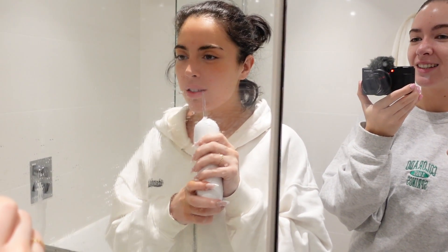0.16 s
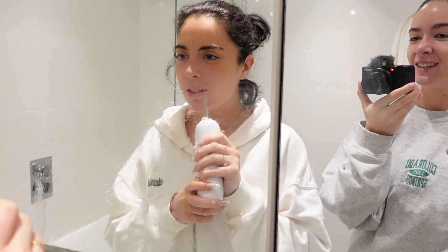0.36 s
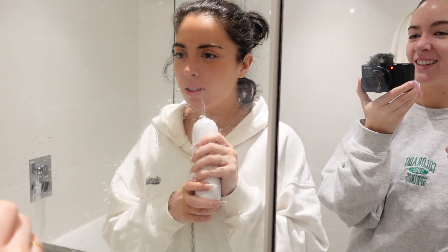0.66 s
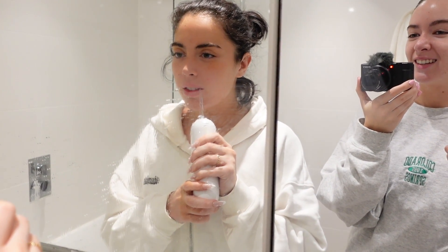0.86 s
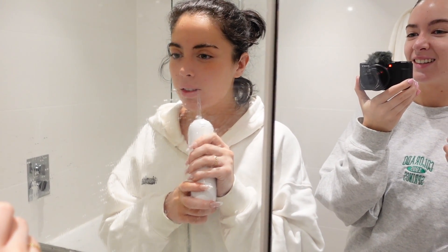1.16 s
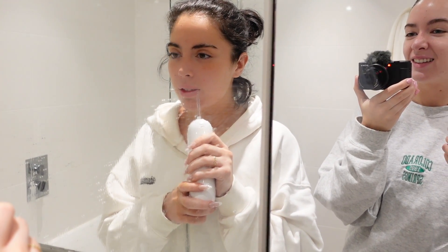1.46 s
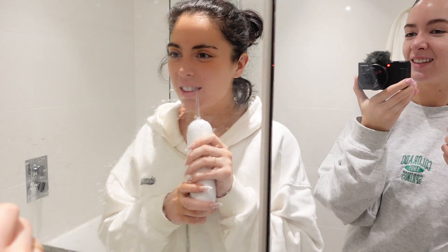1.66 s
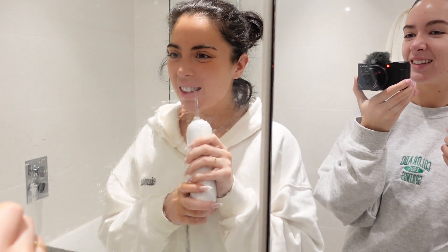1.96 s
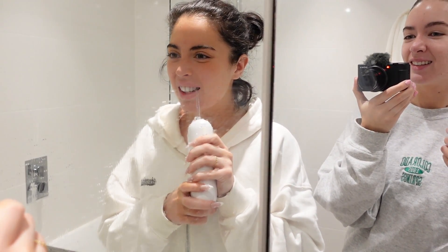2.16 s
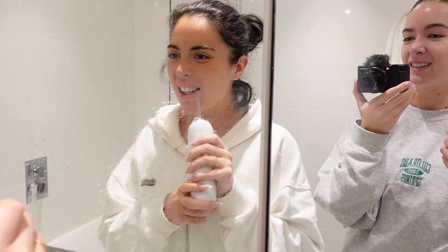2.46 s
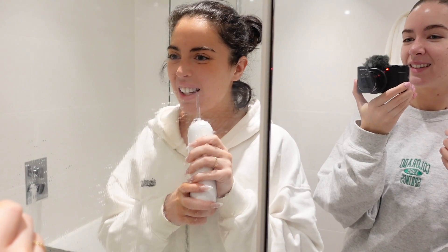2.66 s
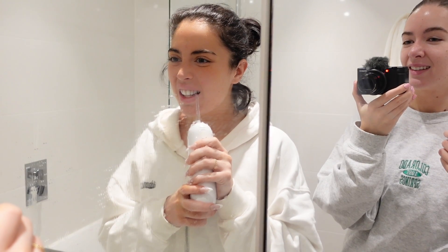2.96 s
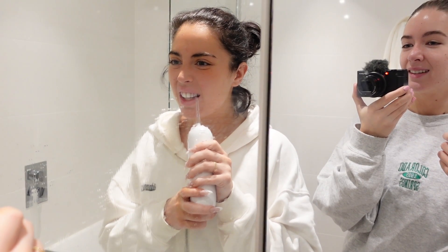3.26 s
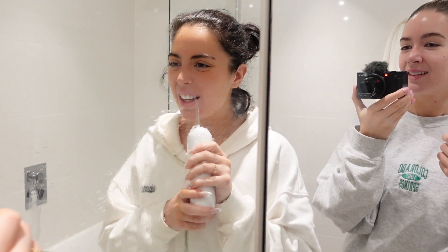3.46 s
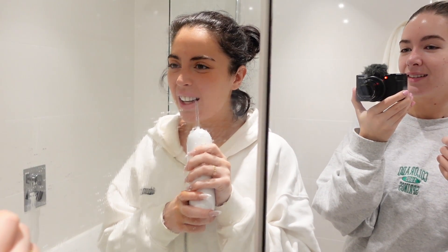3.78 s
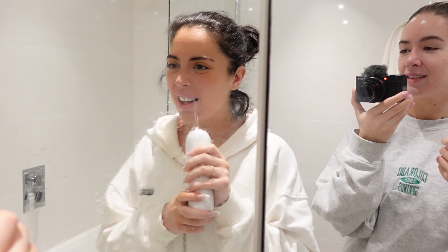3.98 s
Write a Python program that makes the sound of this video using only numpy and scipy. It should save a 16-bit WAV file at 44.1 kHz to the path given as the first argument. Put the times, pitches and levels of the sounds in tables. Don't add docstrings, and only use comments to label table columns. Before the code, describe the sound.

Quiet airy hiss and vent hum, with one dry double-edged button tick, precede a small pump motor that starts suddenly. Its plastic gears chatter and whistle at rapid strokes, ringing the hollow handle, with irregular hard knocks and thin spray hiss over it. Short bright tile reflections surround the close, almost centred sound until the cut.

```python
import sys
import numpy as np
from scipy import signal
from scipy.fft import rfft, irfft, next_fast_len
from scipy.io import wavfile
from scipy.ndimage import uniform_filter1d, minimum_filter1d, map_coordinates

SR = 44100
rng = np.random.default_rng(int(sys.argv[2]) if len(sys.argv) > 2 else 0)


def voltage_ratio(level):
    return 10 ** (np.asarray(level, float) / 20)


def put_to_file(sound):
    columns = np.atleast_2d(sound).T
    safe = np.clip(columns, -1, 1)
    whole_steps = np.round(safe * 32767)
    wavfile.write(sys.argv[1], SR, whole_steps.astype(np.int16))


N = 181824
SWITCH_S = 1.219


def unit(x):
    return x / np.sqrt(np.mean(x ** 2) + 1e-20)


def along(points, hz):
    point_hz, value = np.transpose(points)
    return np.interp(np.log(hz + 1), np.log(point_hz + 1), value)


def curves(rows):
    start_s, *columns = np.transpose(rows)
    return [np.interp(np.arange(N) / SR, start_s, column) for column in columns]


def wobble(rate):
    knots = rng.standard_normal(int(N * rate / SR) + 4)
    return map_coordinates(knots, [np.arange(N) * rate / SR])


def filtered(x, response):
    size = 2 * next_fast_len(N // 2 + SR // 4)
    return irfft(rfft(x, size) * response(np.fft.rfftfreq(size, 1 / SR)), size)[..., :N]


def causal(colour):
    def response(hz):
        cepstrum = irfft(np.log(voltage_ratio(along(colour, hz)) + 1e-5))
        cepstrum[1:len(hz) - 1] *= 2
        cepstrum[len(hz):] = 0
        return np.exp(rfft(cepstrum))
    return response


def modes(table):
    def response(hz):
        total = 0
        for pitch, width, db in table:
            damping = 1j * hz * width
            total = total + voltage_ratio(db) * damping / (pitch * pitch - hz * hz + damping)
        return total
    return response


def ring(hits, gain, extra, response):
    return filtered(hits * gain + extra, response) / np.std(filtered(hits, response))


def patchy(x, depth_db):
    z = signal.stft(x, nperseg=256)[2]
    field = uniform_filter1d(rng.standard_normal(z.shape), size=3, axis=0)
    field = uniform_filter1d(field, size=8, axis=1)
    return unit(signal.istft(z * voltage_ratio(depth_db * unit(field)), nperseg=256)[1][:N])


def hush():
    # pitch_hz [Hz], level_db [dB per Hz]
    air_colour = [(15, -78), (25, -48), (49, -26.5), (141, -8), (179, -9.5), (216, -7.5), (473, -11),
                  (710, -9.5), (955, -15.5), (1360, -13), (1590, -12), (1820, -19), (2330, -18),
                  (4690, -24.5), (15800, -30)]
    # pitch_hz [Hz], likeness [0 to 1]
    likeness = [(60, 0.7), (130, 0.72), (290, 0.79), (640, 0.44), (1410, 0.3), (3100, 0.51), (6820, 0.58),
                (15000, 0.88)]
    # pitch_hz [Hz], width_hz [Hz], level_db [dB]
    duct_modes = [(226, 240, -14), (677, 62, -2.5), (1620, 67, -4)]

    def spread(hz):
        turn = np.arccos(np.clip(along(likeness, hz), -1, 1)) / 2
        return voltage_ratio(along(air_colour, hz)) * np.array([np.cos(turn), np.sin(turn)])

    noise, t = rng.standard_normal((2, N)), np.arange(N) / SR
    draught_s, draught_width_s, draught_db = 0.5, 0.14, 7
    swell_db = draught_db * np.exp(-0.5 * ((t - draught_s) / draught_width_s) ** 2)
    swell_db = swell_db - 3.0 + 0.96 * wobble(9)
    duct = voltage_ratio(swell_db) * filtered(noise, lambda hz: spread(hz) * np.abs(modes(duct_modes)(hz)))
    mid, side = filtered(noise, spread) + duct
    level_db = -62.5 + 0.3 * wobble(6)
    return voltage_ratio(level_db) * unit(np.array([mid + side, mid - side]))


def tiles(x):
    # pitch_hz [Hz], fade_s [s]
    fade_times = [(300, 0.32), (1300, 0.51), (3500, 0.42), (9000, 0.36), (15000, 0.11)]
    hz, t, z = signal.stft(rng.standard_normal((2, SR // 2)), SR, nperseg=256)
    mirror = voltage_ratio(-1.0 - 60 * t / 0.051)
    fall = voltage_ratio(-60 * t / along(fade_times, hz)[:, None]) + mirror
    tail = signal.istft(z * fall, SR, nperseg=256)[1]
    tail = tail / np.linalg.norm(tail[0])
    late = np.pad(x, (150, 0))
    return signal.fftconvolve(late[None], tail, axes=1)[:, :N]


def button():
    # start_s [s], peak_db [dB]
    contacts = [
        (0.1904, -35.5),
        (0.1916, -33.5),
        (.1926, -39),
        (.1934, -45),
        (0.1944, -39),
    ]
    # pitch_hz [Hz], level_db [dB per Hz]
    cap_colour = [(290, -38), (500, -0.5), (1450, 1), (1910, 1.5), (3140, 0.5), (3770, -2), (4870, 1),
                  (5950, -6.5), (8610, -9), (15000, -26)]
    out, t = np.zeros((2, N)), np.arange(SR // 100) / SR
    fade = voltage_ratio(-60 * t / 0.003)
    for start_s, peak_db in contacts:
        tick = fade * np.sign(rng.standard_normal(len(t)))
        out[0, round(start_s * SR):][:len(t)] += voltage_ratio(peak_db + 7.5) * tick
    out[1, round(contacts[1][0] * SR)] = np.linalg.norm(out[0])
    return filtered(out, causal(cap_colour))


def singing():
    # start_s [s], length_s [s], pitch_hz [Hz], level_db [dB]
    rings = [(1.222, .045, 2200, -63), (1.232, 0.028, 1100, -46.5), (1.258, 0.027, 1500, -38.5),
             (1.311, 0.013, 1273, -26), (1.35, 0.017, 1300, -28), (1.355, 0.026, 2020, -31),
             (1.305, .02, 2530, -45), (1.41, 0.092, 2073, -21.5), (1.42, 0.026, 2395, -22.5),
             (1.8, 0.04, 1540, -29), (3.882, 0.017, 1530, -19), (3.463, 0.0296, 570, -42),
             (2.9, 0.057, 510, -49.5), (2.4, 0.021, 1150, -32), (2.35, 0.019, 1180, -30),
             (2, 0.038, 670, -42)]
    out, t = np.zeros(N), np.arange(N) / SR
    for start_s, length_s, pitch_hz, level_db in rings:
        bell = np.sin(np.pi * np.clip((t - start_s) / length_s, 0, 1)) ** 0.62
        out += voltage_ratio(level_db + 4.5) * bell * np.sin(2 * np.pi * pitch_hz * t + 0.36 * wobble(40))
    return out


def effort():
    # start_s [s], load_db [dB]
    back_pressure = [(1.2, 0), (1.43, .5), (1.55, -1), (1.8, -1), (2.06, 0.5), (2.35, -1), (2.55, 2),
                     (2.74, -1), (2.93, 2.5), (3.2, 1), (3.45, 0.5), (3.75, -1), (4.12, -.5)]
    # start_s [s], change_db [dB]
    surges = [(1.32, 0.5), (1.5, -0.5), (1.66, 2.5), (1.7, -2), (2.13, -4), (2.19, 3), (2.23, 0.5),
              (2.28, 5.5), (2.35, 0), (2.47, 1.5), (2.59, -2.5), (2.62, 0.5), (2.72, -2), (2.75, 2),
              (2.83, -1.5), (3.36, -3), (3.47, 1), (3.495, -2), (3.74, 1), (3.6, -2), (3.8, -0.5), (3.9, 2),
              (4.05, 4), (4.115, -1)]
    spin_up_s, surge_half_width_s = 0.084, 0.015
    t = np.arange(N) / SR
    speed = 1 - np.exp(-np.clip(t - SWITCH_S, 1e-6, None) / spin_up_s)
    load_db = curves(back_pressure)[0]
    for start_s, change_db in surges:
        load_db = load_db + change_db * np.exp(-0.5 * ((t - start_s) / surge_half_width_s) ** 2)
    return 20 * np.log10(speed), load_db


def running(level_db):
    return voltage_ratio(level_db) * (np.arange(N) > SWITCH_S * SR)


def crank():
    full_speed_hz, full_stroke_s, head_start_turns, settle_s = 28.53, 1.3074, 0.68, 0.28
    t = np.arange(N) / SR - full_stroke_s
    return full_speed_hz * t + head_start_turns * np.exp(-np.maximum(t, -settle_s) / settle_s)


def stroke(angle, push_db, back_db, lag):
    phase = 2 * np.pi * (angle - lag)
    return voltage_ratio(push_db * np.cos(phase) + back_db * np.cos(2 * phase))


def grip():
    # start_s [s], grip [0 loose, 1 settling, 2 firm]
    hold = [
        (1.4, -0.5),
        (1.55, 0.2),
        (2.0, 0.7),
        (2.45, 2.2),
        (2.75, 2.2),
        (2.9, 1.5),
        (4.12, 4),
    ]
    return curves(hold)[0]


def taps(rate, scatter_db):
    when, sign, size = rng.random((3, N))
    return (when < rate / SR) * np.sign(sign - 0.5) * voltage_ratio(-scatter_db * np.log(size + 0.066))


def knocks(hollow):
    # start_s [s], peak_db [dB], hollow_db [dB on top of the peak]
    blows = [(1.3857, -18, -19), (1.4434, -12, -8), (1.529, -18.5, -21), (1.6044, -14.5, -15),
             (1.652, -20, -14), (1.7134, -16.5, -23), (1.9209, -25, -14), (1.944, -12, -10),
             (2.0022, -23, -7), (2.107, -19, -2), (2.1624, -23, 1), (2.2507, -26, 2), (2.2706, -14.5, 1),
             (2.361, -20, -20), (2.445, -17, -2), (2.475, -17, -11), (2.5145, -16, -18),
             (2.7746, -19, -2.5), (2.8497, -20, -3), (3.0235, -21, -16), (3.391, -15.5, -21),
             (3.4638, -9.5, -6.5), (3.636, -15.5, -6), (3.7346, -13.5, -13), (3.8425, -12.5, -11),
             (3.883, -12, -4), (3.9634, -16, -35), (4.0209, -14.5, -8), (4.049, -6.5, -13),
             (4.105, -15.5, -25)]
    train, t = np.zeros(N + SR), np.arange(SR // 50) / SR
    shape = t / 0.0025 * np.exp(1 - t / 0.0025)
    for start_s, peak_db, hollow_db in blows:
        size = voltage_ratio(peak_db + (hollow_db if hollow else 0))
        chatter = shape * rng.uniform(-1.59, 1.55, len(t))
        train[round(start_s * SR):][:len(t)] += size * chatter
    return train[:N]


def handle(hits, gain, extra):
    # pitch_hz [Hz], width_hz [Hz], loose_db [dB], settling_db [dB], firm_db [dB]
    wall_modes = [(1216, 51, 2, -6, -2.5), (1313, 85, 5, 2.5, -2), (1526, 80, -22, 1, -0.5),
                  (1770, 12, 0, -20, 2), (1986, 10.6, 12.5, 9.5, -21), (2125, 47, 4, 0, -8),
                  (2265, 96, -10, -29, 1), (2436, 74, 4, 0.5, -15), (2568, 77, -5, 0, -2),
                  (2620, 38, -1, -3, -6), (2936, 20, 7, -7, 0), (3040, 62, -14, -12, -1),
                  (3193, 65, -10, -5, -6)]
    # pitch_hz [Hz], level_db [dB per Hz]
    shell_colour = [(470, -61.5), (800, -12), (1220, -6), (1390, -7), (1530, -1), (1900, -1.5), (2780, -1),
                    (3070, 0), (3300, -5), (4290, -33.5), (7260, -120)]
    firmness, out = np.clip(grip(), 0, 2), 0
    for k in range(3):
        walls = modes([(row[0], row[1], row[2 + k]) for row in wall_modes])
        share = np.clip(1 - np.abs(firmness - k), 0, 1)
        out = out + ring(hits, share * gain, share * extra,
                         lambda hz: causal(shell_colour)(hz) * (1 + walls(hz)))
    return out


def clatter(hits, gain, extra):
    # pitch_hz [Hz], level_db [dB per Hz]
    teeth_colour = [(1940, -34.5), (3300, -10), (3360, 0.5), (4230, 1.5), (5050, -1), (5440, -6.5),
                    (7000, -21.5), (9100, -52), (15400, -120)]
    # pitch_hz [Hz], width_hz [Hz], level_db [dB]
    gearbox_modes = [(3840, 17, -9.5), (4320, 24, -12), (4600, 43, -16), (4600, 20, 0.5), (5090, 70, 0.5),
                     (5700, 85, -6), (6380, 70, 3)]
    return ring(hits, gain, extra, lambda hz: causal(teeth_colour)(hz) * (1 + modes(gearbox_modes)(hz)))


def tank(hits, gain, extra):
    # pitch_hz [Hz], width_hz [Hz], level_db [dB]
    tank_modes = [(616, 34, 21), (756, 400, 15.5), (833, 420, -17)]
    path = modes([(680, 500, 0)])
    return ring(hits, gain, extra, lambda hz: modes(tank_modes)(hz) * path(hz))


def jet(spray, gain, extra):
    # pitch_hz [Hz], level_db [dB per Hz]
    jet_colour = [(3240, -32), (5500, -7), (7040, -8), (8220, -8.5), (8900, -10), (10800, -13.5),
                  (12700, -17), (14000, -25.5), (15100, -29), (15800, -31)]
    # pitch_hz [Hz], width_hz [Hz], level_db [dB]
    nozzle_modes = [(7600, 59, -4), (8250, 300, -6), (9250, 150, -7), (10550, 260, -3), (15000, 500, -3)]
    return ring(spray, gain, extra, lambda hz: causal(jet_colour)(hz) * (1 + modes(nozzle_modes)(hz)))


def whistle(angle, load_db):
    # start_s [s], pitch_hz [Hz]
    upper_pitch = [
        (1.45, 2992),
        (2.0, 3040),
        (2.8, 3078),
        (3.2, 3124),
        (4.12, 3107),
    ]
    mesh_hz, middle_hz = 1543, 2254
    t = np.arange(N) / SR
    low_db = -30.5 + 1.2 * load_db + 1.8 * wobble(7.01)
    high_db = -29.5 + 0.37 * load_db + 0.47 * wobble(7.01)
    middle_db = -35 + 0.4 * load_db + 1.5 * wobble(7.01)
    start = np.clip((t - 1.45) / 0.1, 0, 1)
    sway = 0.11 * np.sin(2 * np.pi * angle) + 0.22 * wobble(24)
    low = np.sin(2 * np.pi * (mesh_hz * t + sway))
    drift = wobble(45)
    high = np.sin(2 * np.pi * (np.cumsum(curves(upper_pitch)[0]) / SR + 0.38 * drift))
    middle = np.sin(2 * np.pi * (middle_hz * t - 0.24 * drift[::-1]))
    uneven = wobble(28.18)
    low_beads = unit(stroke(angle, push_db=6, back_db=3, lag=0.96) * voltage_ratio(1.8 * uneven))
    high_beads = unit(stroke(angle, push_db=8, back_db=2, lag=0.98) * voltage_ratio(1.6 * wobble(28)))
    middle_beads = unit(stroke(angle, push_db=6, back_db=2, lag=0.05) * voltage_ratio(2.5 * uneven[::-1]))
    tones = voltage_ratio(low_db - 3.0) * low_beads * low
    tones = tones + voltage_ratio(high_db - 3.0) * high_beads * high
    tones = tones + voltage_ratio(middle_db - 2) * middle_beads * middle
    return start * np.sqrt(2) * tones


def small_body(hz):
    cut_hz = 477
    gentle = 1j * hz / (cut_hz + 1j * hz)
    steep = -hz * hz / (cut_hz ** 2 - hz * hz + 0.6j * hz * cut_hz)
    return gentle ** 2 * steep ** 2


def pump():
    speed_db, load_db = effort()
    rattle_db = -22.5 + 1.48 * speed_db + 0.94 * load_db
    jet_db = -43.5 + 2.45 * speed_db + 0.86 * load_db
    tank_db = -43 + 0.85 * speed_db + 1.46 * load_db
    clatter_db = -30 + 2.25 * speed_db + 1.02 * load_db
    clatter_db = clatter_db + 1 - grip() / 2

    angle, blows = crank(), knocks(hollow=False)
    shake = voltage_ratio(0.4 * wobble(14) + 0.56 * wobble(60))
    hits = unit(taps(3500, scatter_db=2.5) * shake) + 0.89 * rng.standard_normal(N)
    hits = patchy(hits, depth_db=0.9)
    spray = 1.23 * unit(taps(2500, scatter_db=1.5) * shake) + rng.standard_normal(N)
    spray = patchy(spray, depth_db=1.5)

    load = stroke(angle, push_db=1.54, back_db=0.9, lag=0.013)
    body = handle(hits, load * running(rattle_db - 1.0), voltage_ratio(-5) * blows)
    load = stroke(angle, push_db=1.35, back_db=1.45, lag=0.036)
    teeth = clatter(hits, load * running(clatter_db - 0.93), voltage_ratio(-10.5) * blows)
    low = tank(hits, running(tank_db - 8.5), voltage_ratio(-19.5) * knocks(hollow=True))
    load = stroke(angle, push_db=1.35, back_db=1.0, lag=0.02)
    hiss = jet(spray, load * running(jet_db), voltage_ratio(-25) * blows)
    return filtered(body + teeth + low + whistle(angle, load_db) + hiss, small_body)


def scene():
    # [side minus middle, dB]
    echo_width = [(200, -9), (500, -13.5), (1000, -16), (2000, -19), (3500, -23.5), (5000, -16),
                  (6000, -44), (9500, -15.5), (11000, -55)]
    flosser = pump() + singing()
    click, scattered = button()
    wet_mid, wet_side = tiles(voltage_ratio(-11.0) * flosser + voltage_ratio(-3.0) * scattered)
    mid = voltage_ratio(-1) * flosser + click + wet_mid
    side = filtered(wet_side, lambda hz: voltage_ratio(along(echo_width, hz) + 5.0))
    side = side + filtered(mid, lambda hz: 0.02 * (hz < 9600))
    return np.array([mid + side, mid - side]) + hush()


def low_pass(x):
    return signal.sosfilt(signal.butter(12, 15950, fs=SR, output="sos"), x)


def record(dry):
    need = np.minimum(1, 0.5 / (np.abs(dry).max(axis=0) + 1e-9))
    gain = uniform_filter1d(minimum_filter1d(need, size=401), size=201)
    mix = filtered(dry * gain, lambda hz: hz < 15900)
    return low_pass(mix)


dry = scene()
out = record(dry)
put_to_file(out)
```